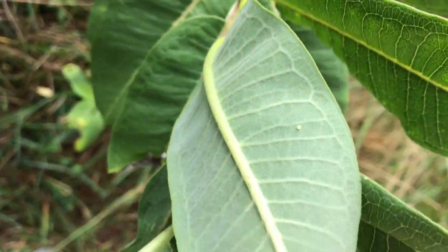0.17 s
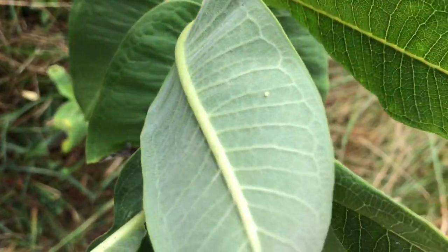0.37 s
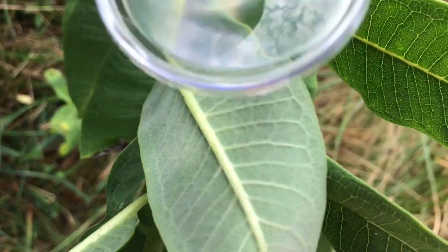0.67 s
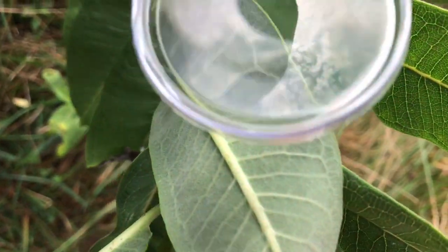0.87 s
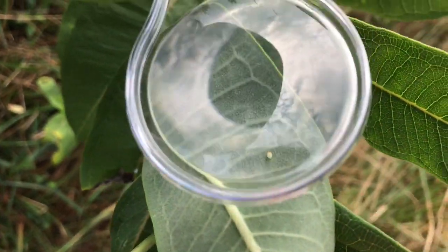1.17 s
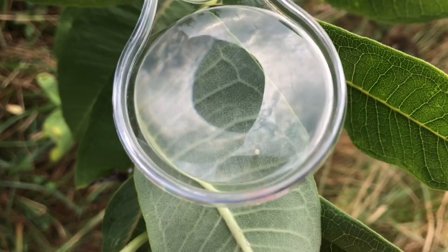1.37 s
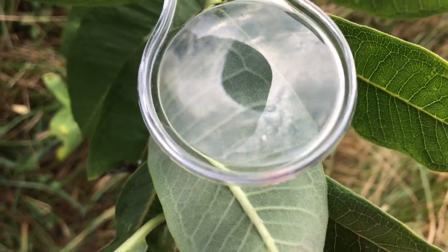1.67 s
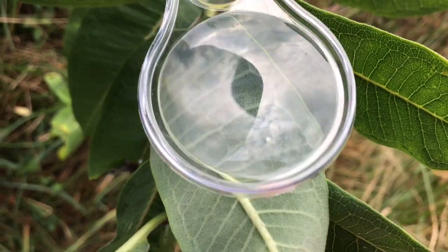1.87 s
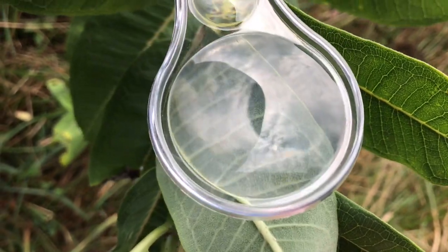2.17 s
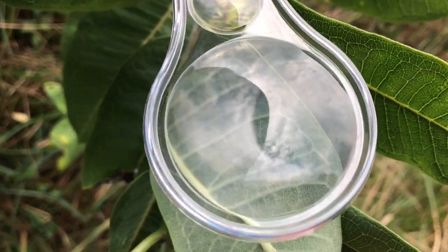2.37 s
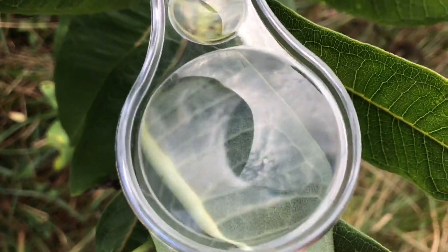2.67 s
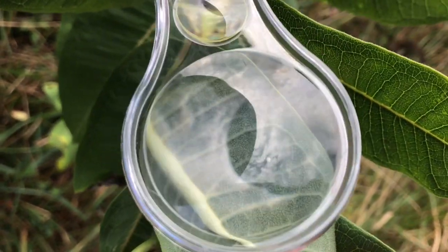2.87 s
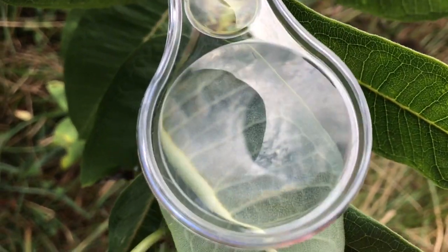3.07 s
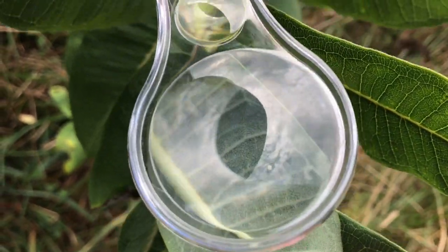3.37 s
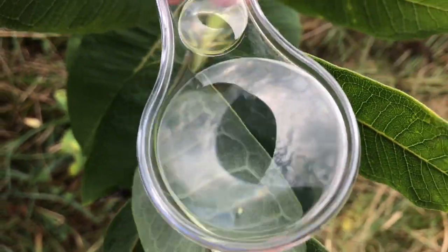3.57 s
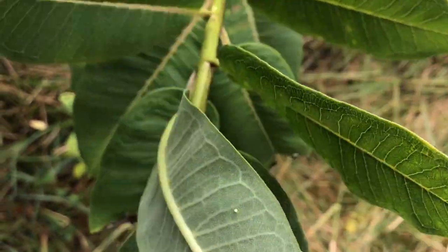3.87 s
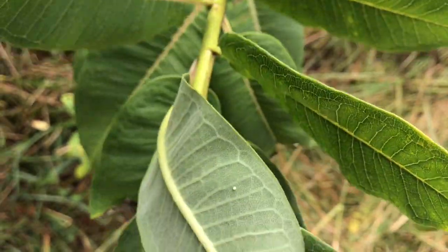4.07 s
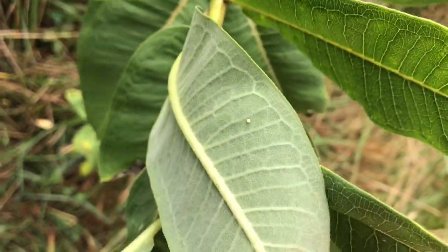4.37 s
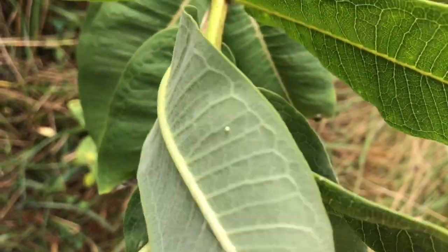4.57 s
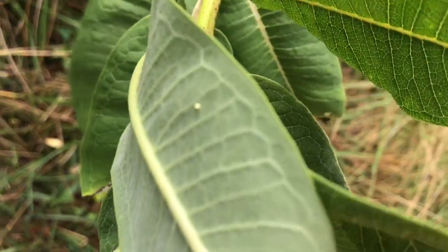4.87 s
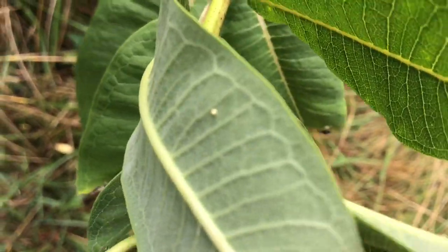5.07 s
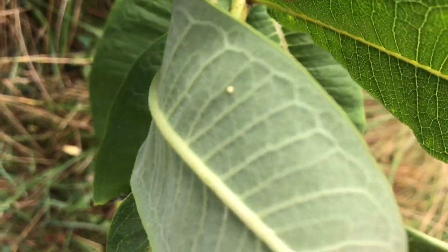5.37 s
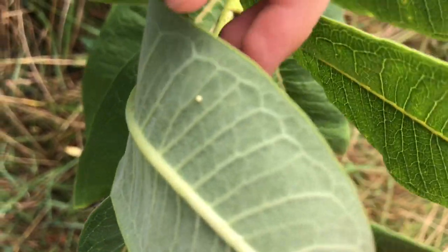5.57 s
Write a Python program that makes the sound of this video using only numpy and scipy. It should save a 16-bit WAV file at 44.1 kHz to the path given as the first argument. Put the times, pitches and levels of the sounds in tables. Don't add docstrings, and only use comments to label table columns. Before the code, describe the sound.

Outdoors among grass, crickets rasp in continuous silvery trills, with a thin higher katydid buzz and soft air hiss. Far road and engine rumble grows slightly. Sharp rising bird chips recur, fainter late on. Close to the single microphone come small leaf ticks, two bouts of dull case bumps, a quiet middle, then busier dry rubbing and brittle folding of the leaf in the last second.

```python
import sys
import numpy as np
from scipy import signal
from scipy.fft import rfft, irfft, next_fast_len
from scipy.io import wavfile
from scipy.ndimage import map_coordinates

SR = 44100
rng = np.random.default_rng(int(sys.argv[2]) if len(sys.argv) > 2 else 0)


def amplitude_ratio(level_db):
    exponent = np.asarray(level_db, float) / 20
    return 10 ** exponent


def materialize(psi):
    bounded = np.clip(np.atleast_2d(psi).T, -1, 1)
    quanta = np.round(bounded * 32767).astype(np.int16)
    wavfile.write(sys.argv[1], SR, quanta)


N = 251811


def curve(rows, column=1):
    rows = np.array(rows)
    return np.interp(np.arange(N) / SR, rows[:, 0], rows[:, column])


def seconds(length):
    return np.arange(int(length * SR)) / SR


def unit(x):
    return x / np.sqrt(np.mean(x ** 2) + 1e-20)


def wobble(rate, size=N):
    knots = rng.standard_normal(int(size * rate / SR) + 4)
    return map_coordinates(knots, [np.arange(size) * rate / SR])


def noise(points, size=N):
    m = next_fast_len(size + 2048)
    f, db = np.transpose(points)
    log_hz = np.log(np.fft.rfftfreq(m, 1 / SR) + 1)
    gain = amplitude_ratio(np.interp(log_hz, np.log(f + 1), db, -120, -120))
    return unit(irfft(rfft(rng.standard_normal(m)) * gain, m)[:size])


def add(track, s, sound):
    part = track[max(round(s * SR), 0):][:len(sound)]
    part += sound[:len(part)]


def voice(hz, overtone_db):
    turn = 2 * np.pi * np.cumsum(hz) / SR
    return np.sin(turn) + amplitude_ratio(overtone_db) * np.sin(2 * turn)


def scattered(x, wet_db, t60):
    t = seconds(t60)
    tail = rng.standard_normal(len(t)) * amplitude_ratio(-60 * t / t60)
    return x + amplitude_ratio(wet_db) * signal.fftconvolve(x, tail / np.linalg.norm(tail))[:N]


# pitch_hz, level_db (per Hz)
AIR_SPECTRUM = [(900, -2), (1300, 4.5), (2200, 0.5), (4500, -3), (7000, -7), (8700, -4.5), (10500, -9),
                (12500, -10), (14200, -1.5), (15800, -12)]
# time_s, level_db
STIR = [(0, -73.5), (.25, -71), (.62, -75.5), (1.81, -73.5), (2.3, -73.5), (3.04, -72.5), (3.96, -73),
        (4.45, -65.5), (4.83, -68), (5.06, -60), (5.44, -66), (5.57, -70), (5.71, -74)]


def air():
    stir_db = curve(STIR)
    mid_db = stir_db - 2.0 + 2.45 * wobble(40)
    mid = amplitude_ratio(mid_db) * noise([(1300, -2.0), (2200, -3.5), (3800, -1), (5500, 0.5), (8000, -6.0)])
    high_db = -75.5 + 0.76 * (stir_db + 73.0) + 2.0 * wobble(40)
    high = amplitude_ratio(high_db) * noise([(6500, -8), (9000, 7.5), (11000, 8.0), (13500, 7.0), (15800, 2)])
    return amplitude_ratio(-75.5) * noise(AIR_SPECTRUM) + mid + high


# pitch_hz, level_db (per Hz)
DEEP_SPECTRUM = [(12, -75), (20, -29), (38, -6), (54, 3), (102, -6), (119, -14.5), (140, -3.5), (180, -43),
                 (310, -120)]
# pitch_hz, level_db (per Hz)
ROAD_SPECTRUM = [(65, -6), (110, -10), (119, -3.5), (253, -13.5), (296, -18.5), (450, -26.5), (580, -30.5),
                 (990, -120)]
# pitch_hz, level_db (per Hz)
TYRE_SPECTRUM = [(300, -4.5), (500, -1.5), (950, 3.5), (1300, -5.5), (2200, -42), (4000, -50)]
# multiple, level_db
ENGINE_ORDERS = [(2, -62.5), (5, -56.5), (7, -72.5), (8, -62.5), (9, -67), (10, -64.5), (11, -69.5),
                 (12, -69), (13, -72.5)]
# pitch_hz, width_hz, level_db
ENGINE_HUM = (55.5, 4.2, -54.5)
# time_s, level_db
APPROACH = [(0, -5), (1.7, -7), (2.3, -1), (3.5, -1.5), (4.5, 2), (5.71, 2)]


def traffic():
    near_db = curve(APPROACH)
    firing_hz = 20.61 * (1 + 0.004 * wobble(1.49))
    turn = 2 * np.pi * np.cumsum(firing_hz) / SR
    orders = np.zeros(N)
    for multiple, db in ENGINE_ORDERS:
        phase = rng.uniform(0, 2 * np.pi)
        orders += amplitude_ratio(db + 2.56 * wobble(2.595)) * np.sin(multiple * turn + phase)
    hz, width_hz, db = ENGINE_HUM
    hum = amplitude_ratio(db) * noise([(hz - width_hz, -20), (hz, 0), (hz + width_hz, -20)])
    deep = amplitude_ratio(-52.5 + 0.14 * near_db + 0.29 * wobble(5.88)) * noise(DEEP_SPECTRUM)
    road = amplitude_ratio(-60 + 0.22 * near_db + 2.5 * wobble(9.8)) * noise(ROAD_SPECTRUM)
    tyres = amplitude_ratio(-71 + 0.35 * near_db + wobble(4.67)) * noise(TYRE_SPECTRUM)
    return deep + road + tyres + amplitude_ratio(near_db) * (orders + hum)


# pitch_hz, level_db (per Hz)
CHORUS_SPECTRUM = [(4600, -53), (4900, -18), (5100, -9), (6000, -1.5), (6600, -2), (7150, 0), (7400, -2.5),
                   (7600, -6.5), (8200, -20), (8450, -26)]


def chorus():
    return amplitude_ratio(-64.5 + 1.5 * wobble(30)) * noise(CHORUS_SPECTRUM)


# start_s, length_s
PAUSES = [
    (2.37, .22),
    (3.58, 0.17),
]


def katydid():
    t = np.arange(N) / SR
    edge_s = .06
    resting = np.zeros(N)
    for s, length in PAUSES:
        resting += np.clip(np.minimum(t - s, s + length - t) / edge_s + .5, 0, 1)
    buzz = 1 + 0.6 * np.cos(2 * np.pi * 84.0 * t)
    band = noise([(11600, -15), (12200, -16), (12500, 7), (12900, -8), (13600, -53)])
    return amplitude_ratio(-85 - 8 * resting) * buzz * band


def swarm(count=9):
    low_hz, high_hz, dip_hz = 5200, 7000, 250
    out, t = np.zeros(N), np.arange(N) / SR
    for k, (spread, pace, start) in enumerate(rng.random(size=(count, 3))):
        cycle = t * (30 + 30 * pace) + start
        u = np.clip((cycle % 1 - .5) * 3, -1, 1)
        hz = low_hz + (high_hz - low_hz) * (k + spread) / count - dip_hz * u
        stroke = np.cos(np.pi / 2 * u) * amplitude_ratio(3 * wobble(6))
        out += stroke * np.sin(2 * np.pi * np.cumsum(hz) / SR)
    return amplitude_ratio(-68.5) * unit(scattered(out, wet_db=-5, t60=.08))


# pulse_s (time of one pulse), rate_hz, end_dip_hz, slope_hz (across a pulse),
# sounding_share (of the cycle), overtone_db
TRILLERS = [
    (2.335, 49.1, 480, -160, .8, -21),
    (2.4917, 49.6, 400, 0, .75, -40),
    (3.960, 46.83, 750, 350, .9, -34),
    (.7195, 32.87, 100, -600, .65, -40),
]
# time_s, top_pitch_hz, level_db
SONGS = [
    [(0, 7190, -62.5), (2, 7160, -62.5), (3.22, 7130, -62), (3.3, 7130, -90)],
    [(0, 8080, -76.5), (1.9, 8020, -79), (3.3, 8050, -74), (4.1, 8050, -76.5), (5.71, 8100, -85)],
    [(3.1, 7250, -90), (3.3, 7300, -68), (3.8, 7400, -64), (4.6, 7420, -63.5), (5, 7500, -64.5),
     (5.4, 7600, -62), (5.71, 7620, -60.5)],
    [(0, 5950, -72.5), (2, 5870, -71), (4.3, 5850, -71.5), (4.7, 6000, -69), (5.71, 5950, -72)],
]


def trills():
    out = np.zeros(N)
    for (s, rate, dip_hz, slope_hz, share, overtone_db), song in zip(TRILLERS, SONGS):
        cycle = (np.arange(N) / SR - s) * rate + .04 * wobble(3)
        u = np.clip(((cycle + .5) % 1 - .5) / share * 2, -1, 1)
        hz = curve(song) - dip_hz * u ** 2 + slope_hz / 2 * u
        hz += 25 * wobble(80) + 45 * wobble(400)
        uneven_db = 1.5 * wobble(300) + 1.1 * wobble(45) + .8 * wobble(4)
        stroke = np.cos(np.pi / 2 * u) ** .5 * amplitude_ratio(uneven_db)
        out += amplitude_ratio(curve(song, column=2)) * unit(stroke * voice(hz, overtone_db))
    return scattered(out, wet_db=-7, t60=.07)


# start_s, level_db, length_s
HIGH_CALLER = [(0.229, -59, 0.1), (0.682, -61.5, 0.089), (1.113, -63, 0.11), (1.518, -60, 0.12),
               (1.956, -58.5, 0.089), (2.399, -61, 0.12), (2.856, -64, 0.089), (3.291, -59.5, .12),
               (3.73, -59, .1), (4.149, -60.5, 0.073), (4.835, -59.5, .11)]
# start_s, level_db, length_s
LOW_CALLER = [(.11, -63.5, 0.098), (.572, -61, 0.1), (1.062, -60, .091), (1.551, -62.5, 0.067),
              (2.008, -61.5, 0.087), (2.47, -63, 0.088), (2.932, -61, 0.086), (3.415, -65, 0.1),
              (3.876, -62, 0.095), (4.333, -61.5, .095), (4.822, -62.5, .1), (5.33, -67, 0.12)]


def chirps():
    out = np.zeros(N)
    for caller, pitch_hz, octave_db in ((HIGH_CALLER, 6700, -31), (LOW_CALLER, 6530, -22)):
        for s, db, length in caller:
            t = seconds(length)
            u = t * 74.5 % 1
            stroke = np.sin(np.pi * np.clip(u / .6, 0, 1)) ** .7 * amplitude_ratio(1.3 * wobble(81, size=len(t)))
            hz = pitch_hz - 250 * (u - .35) + 25 * wobble(150, size=len(t))
            add(out, s, amplitude_ratio(db + 8.5) * stroke * voice(hz, octave_db))
    return scattered(out, wet_db=-10, t60=0.14)


# start_s, length_s, start_hz, end_hz, level_db
FAR_NOTES = [
    (0, .08, 3080, 3400, -74),
    (0, .09, 1270, 1270, -71),
    (.36, .078, 2950, 3020, -71),
    (.97, .15, 2580, 2760, -76),
    (1.115, .1, 2720, 2770, -75),
    (1.12, .15, 2570, 2580, -77),
    (2.812, .013, 2850, 2850, -63),
    (4.858, .14, 2620, 2600, -62),
]


def far_notes():
    out = np.zeros(N)
    for s, length, start_hz, end_hz, db in FAR_NOTES:
        hz = np.linspace(start_hz, end_hz, int(length * SR))
        hz = hz + 35 * wobble(300, size=len(hz))
        shape = np.hanning(len(hz)) ** .25 * amplitude_ratio(db + 2 * wobble(150, size=len(hz)))
        add(out, s, shape * voice(hz, overtone_db=-40))
    return scattered(out, wet_db=-7.5, t60=.17)


# start_s, start_hz, top_hz, length_s, level_db
CHIPS = [
    (0.216, 4640, 7230, 0.038, -45.5),
    (1.228, 4670, 7380, 0.025, -43.5),
    (1.797, 4480, 7230, 0.012, -45),
    (1.819, 7110, 7240, 0.018, -47),
    (2.6, 4390, 7050, 0.036, -45),
    (3.2400, 4640, 7200, 0.047, -45),
    (3.659, 4850, 7120, 0.04, -47.5),
    (4.213, 4810, 7070, 0.042, -46),
    (4.894, 5220, 7320, 0.034, -56),
    (5.370, 5300, 7030, 0.015, -56),
]
FLICKS_DB = [3, 6, 3, 2, 3, -2, -3, -2, -3, 7]
# delay_s, level_db
ECHOES = [
    (.0019, -16),
    (.004, -21),
    (.0068, -19),
    (.0135, -19),
    (.021, -25),
]


def bird():
    flick_s, settle_s, settle_share = 0.00479, 0.01095, 0.232
    out = np.zeros(N)
    for (s, start_hz, top_hz, length, db), flick_db in zip(CHIPS, FLICKS_DB):
        t = seconds(length)
        flick = np.exp(-(t / flick_s * (1 + 0.041 * s)) ** 1.5)
        settle = np.exp(-t / settle_s)
        hz = top_hz - (top_hz - start_hz) * ((1 - settle_share) * flick + settle_share * settle)
        hz += 35 * s * wobble(246, size=len(t))
        hz -= 348 * np.exp((t - length) / 0.0018)
        edges = np.minimum(t / .004, 1) ** 1.3 * np.minimum((length - t) / .004, 1)
        fade_db = flick_db * np.exp(-(t / .008) ** 4) - 110 * (t - .015)
        tremor_db = 3 * (1 - np.exp(-(t / .012) ** 2)) * wobble(320, size=len(t))
        overtone_db = -13 - 9 * s + (8 + 9 * s) * np.exp(-t / .007)
        chip = amplitude_ratio(db + tremor_db + fade_db) * edges * voice(hz, overtone_db)
        add(out, s, chip)
        for delay_s, echo_db in ECHOES:
            add(out, s + delay_s, amplitude_ratio(echo_db + 1.5 * s) * chip)
    return scattered(out, wet_db=-7.5, t60=.17)


# start_s, peak_db, ring_hz, t60_s
BUMPS_AND_SNAPS = [(1.026, -41, 414, 0.02), (1.0944, -24, 513, 0.011), (1.099, -38.5, 377, 0.027),
                   (1.0936, -43, 934, 0.024), (1.109, -30, 600, 0.01), (1.577, -35, 68.6, 0.36),
                   (1.584, -25.5, 118, 0.068), (1.585, -36, 237, 0.034), (3.785, -49, 2630, 0.0068),
                   (3.8, -53, 2500, 0.0043), (4.1571, -35, 1850, 0.0028), (4.157, -35, 3050, 0.0031),
                   (5.474, -32.5, 305, 0.03), (5.475, -39.5, 1020, 0.039), (1.1062, -33, 3200, 0.0014),
                   (1.1079, -30, 2020, 0.0021), (1.1076, -37, 3900, .0015), (1.1124, -38.5, 630, 0.018),
                   (5.6135, -39.5, 3840, 0.0037), (5.6128, -39, 11500, 0.00087), (5.475, -35, 3300, .0015),
                   (5.481, -40, 3500, .0015), (5.4878, -42, 2500, .0015), (3.5045, -36, 12000, 0.00067),
                   (5.0512, -39, 4500, .001), (5.083, -33, 4000, 0.0017), (5.3175, -40, 8000, .0008),
                   (5.548, -43, 9500, .0015), (4.9356, -37, 3000, .0015), (5.513, -44, 3500, .001)]


def bumps_and_snaps():
    out, t = np.zeros(N), np.arange(SR // 4) / SR
    for s, db, hz, t60 in BUMPS_AND_SNAPS:
        onset = 1 - np.exp(-t * hz * 3)
        add(out, s, amplitude_ratio(db - 60 * t / t60) * onset * np.sin(2 * np.pi * hz * t))
    return out


# start_s, length_s, centre_hz, width_hz,
# level_db
BLADE_SCRAPES = [(.199, .006, 3130, 500, -57.5), (0.318, 0.0056, 4330, 700, -59),
                 (0.358, .006, 4500, 600, -53), (.376, .004, 4300, 600, -57), (.4, .005, 4500, 500, -59),
                 (.361, 0.007, 1800, 500, -57), (.376, .004, 1900, 400, -54), (.4095, .004, 3100, 500, -55),
                 (.388, .008, 3000, 500, -61), (.414, 0.006, 1000, 400, -56),
                 (0.979, 0.19, 2960, 900, -74.5), (3.392, 0.031, 4220, 600, -72),
                 (3.428, 0.045, 3360, 800, -67), (3.555, 0.021, 3100, 900, -56.5),
                 (3.553, 0.016, 1100, 706, -57), (3.855, .005, 10700, 3000, -55.5),
                 (4.439, 0.01, 1200, 500, -65), (4.495, 0.0056, 1300, 400, -62.5),
                 (4.574, .008, 1300, 600, -65), (4.764, 0.0066, 3770, 600, -60.5),
                 (4.884, .045, 3700, 500, -61), (4.882, .05, 5630, 500, -61),
                 (4.918, 0.012, 3600, 500, -52), (4.955, .01, 3750, 500, -58), (4.984, .01, 3700, 450, -52),
                 (4.982, 0.0052, 1470, 404, -51), (4.987, 0.03, 1280, 600, -55),
                 (4.998, .028, 3800, 400, -62), (5.038, 0.017, 4130, 700, -60),
                 (5.06, 0.021, 5900, 700, -56), (5.06, 0.019, 1470, 800, -53),
                 (5.117, .012, 1200, 500, -59), (5.14, 0.1, 1200, 610, -61.5),
                 (5.152, .05, 4350, 800, -57.5), (5.302, .013, 5700, 700, -44),
                 (5.301, .012, 4000, 500, -48), (5.314, .008, 1150, 600, -52),
                 (5.302, .01, 8600, 900, -51), (5.308, .006, 12700, 600, -59),
                  (5.47, .016, 1100, 450, -50), (4.924, .007, 8800, 1500, -60),
                  (5.049, .004, 10000, 4000, -56), (5.063, .006, 10000, 4000, -59),
                  (5.118, .008, 9000, 3000, -60), (5.558, 0.014, 1300, 700, -57.5),
                  (5.61, 0.0047, 3850, 900, -55), (0.379, .006, 900, 400, -59),
                  (4.819, .05, 4200, 900, -66)]


def scrapes():
    out = np.zeros(N)
    for s, length, hz, width_hz, db in BLADE_SCRAPES:
        t = seconds(length * 1.5)
        shape = np.minimum(t / (.2 * length), 1) * np.exp(-(t / length) ** 4)
        shape *= amplitude_ratio(2 * wobble(300, size=len(t)))
        wide = 1 + width_hz / hz
        band = [(hz / wide ** 2, -22), (hz / wide, -5), (hz, 0), (hz * wide, -5), (hz * wide ** 2, -22)]
        add(out, s, amplitude_ratio(db) * shape * noise(band, size=len(t)))
    return out


def contact(length, soft, grain_db, low_db, middle_db, upper_db, high_db, top_db):
    t = seconds(length * 1.5)
    shape = np.minimum(t / (soft * length), 1) * np.exp(-(t / length) ** 4)
    shape *= amplitude_ratio(grain_db * wobble(270, size=len(t)))
    colour = np.array([(300, low_db + 7.5), (800, low_db + 0.5), (1600, low_db),
                       (2300, middle_db), (3000, middle_db), (3800, -4.5),
                       (4600, upper_db), (5600, upper_db), (7500, high_db * 0.7),
                       (10000, high_db + 4), (15000, top_db + 3), (16000, top_db + 1.5)])
    colour[:, 1] += 1.8 * rng.standard_normal(len(colour))
    return amplitude_ratio(max(low_db, high_db, 0) * 0.035) * shape * noise(colour, size=len(t))


# start_s, peak_db (at 3.5 kHz), dullness_db (1.2 kHz over 3.5 kHz)
TICKS = [(.163, -63, -3), (0.2006, -42, -7.5), (0.2608, -48.5, -5), (0.266, -46.5, -2), (0.3212, -43, -4),
         (.359, -49, 0), (.369, -44, -5), (0.377, -47, -6), (0.383, -47, 2), (.392, -51, -5),
         (0.402, -54, 2), (0.41, -54, -15), (0.419, -60, 0), (0.427, -52, -9), (1.0955, -59, 6),
         (0.969, -53, 2), (1.026, -54, -4), (1.1066, -46, -3), (1.504, -53.5, 7), (1.5424, -61.5, 0),
         (1.633, -62, 16), (2.953, -56, 5), (3.5037, -51, -13), (3.597, -56, 8), (3.614, -55, 0),
         (4.1573, -56, 0), (4.4263, -45, -8.5), (4.9356, -49.5, 1), (5.037, -57, 0), (5.456, -46, -5),
         (5.461, -46, -1), (5.471, -50, 6), (5.482, -43, 6), (5.488, -54, 3), (5.438, -47.5, 10),
         (5.599, -46, -8), (5.613, -50, -8)]
# start_s, length_s, peak_db, dullness_db
CRACKLES = [
    (5.127, 0.1, -76, -16),
    (5.457, 0.078, -55, -1),
]


def ticks():
    out = np.zeros(N)
    grains = []
    for s, length, db, dull_db in CRACKLES:
        for when, size in rng.random(size=(14, 2)):
            grains.append((s + when * length, db + 2.5 * (size - .5) * 2, dull_db))
    for s, db, dull_db in TICKS + grains:
        snap = contact(.003, .08, 1.2, dull_db, 1.4 * dull_db - 1, upper_db=-9.5, high_db=-19, top_db=-31)
        add(out, s, amplitude_ratio(db - 5) * snap)
    return out


# start_s, peak_db (at 3.5 kHz), dullness_db, hiss_db (10 kHz over 3.5 kHz), length_s
SCUFFS = [(.2044, -56.5, 6, -5, 0.021), (2.6, -63, -6, -10, 0.091), (2.672, -61.5, -6, -16, 0.022),
          (3.5034, -59, -1, 15, 0.028), (3.552, -55, -6, -15, 0.025), (3.818, -64, -4, 6, .004),
          (4.0213, -63.5, -8, 10, .02), (4.0594, -70, 5, 5, 0.039), (4.4314, -52.5, -7, -11, 0.017),
          (5.1193, -56, 5, -16, 0.038), (5.1644, -53, 4, -1, 0.021), (5.456, -49.5, -5, -19, 0.026),
          (5.4745, -53.5, -5, -30, 0.032), (5.4994, -53.5, -5, -20, 0.032), (5.546, -51, -3, -4, 0.018),
          (5.5521, -49.5, 1, -22, 0.017), (5.5992, -53.5, 8, -23, 0.015)]
# start_s, peak_db (at 3.5 kHz), dullness_db, hiss_db (10 kHz over 3.5 kHz), length_s
RUBS = [(.36, -46, 2, -10, 0.066), (2.4594, -57.5, -6, -13, 0.079), (3.3946, -55.5, -11, -19, 0.058),
        (3.4408, -52, -14, -20, .03), (3.9794, -60, -8, 17, 0.067), (4.2894, -55.5, -20, -4, 0.06),
        (4.3594, -59, 2, 5, 0.14), (4.4994, -52.5, -18, -10, 0.095), (4.5601, -55, -11, -7, 0.085),
        (4.8399, -48, -7, -11, 0.062), (4.8895, -45.5, -9, -12, 0.035), (4.9872, -50.5, 8, -21, 0.051),
        (5.0894, -44, -19, -13, 0.042), (5.15, -50, -4, -16, 0.07), (5.2301, -55.5, -3, -19, .079),
        (5.2661, -39, -16, -16, 0.045)]


def scuffs_and_rubs():
    out = np.zeros(N)
    for table, soft, trim_db in ((SCUFFS, .3, -2), (RUBS, .4, -9)):
        for s, db, dull_db, high_db, length in table:
            slide = contact(length, soft, 1.8, dull_db, dull_db / 2 - 6, high_db / 2, high_db, high_db - 12)
            add(out, s, amplitude_ratio(db + trim_db) * slide)
    return out


# start_s, peak_db (at 3.5 kHz), length_s
CRUNCHES = [
    (5.042, -41, 0.043),
    (5.058, -36, 0.025),
    (5.2635, -43, 0.024),
    (5.2874, -39.5, 0.014),
    (5.3005, -32, 0.016),
]


def crunches():
    out = np.zeros(N)
    for s, db, length in CRUNCHES:
        fold = contact(length, .2, 1.3, low_db=-15, middle_db=-14, upper_db=-1.5, high_db=-13, top_db=-25)
        add(out, s, amplitude_ratio(db - 8) * fold)
    return out


def scene():
    background = air() + traffic() + chorus() + katydid() + swarm()
    animals = trills() + chirps() + far_notes() + bird()
    leaf = scrapes() + ticks() + scuffs_and_rubs() + crunches()
    return (background + animals + bumps_and_snaps() + leaf)[None]


def low_pass(x):
    return signal.sosfilt(signal.butter(12, 15740, fs=SR, output="sos"), x)


# pitch_hz, width_hz, level_db
PORT_NOTCH = (10380, 980, -6)


def record(dry):
    hz = np.fft.rfftfreq(N, 1 / SR)
    centre_hz, width_hz, db = PORT_NOTCH
    notch = amplitude_ratio(db * np.exp(-((hz - centre_hz) / width_hz) ** 2))
    mix = irfft(rfft(dry) * notch * (hz < 15740), N)
    return low_pass(mix)


dry = scene()
out = record(dry)
materialize(out)
```